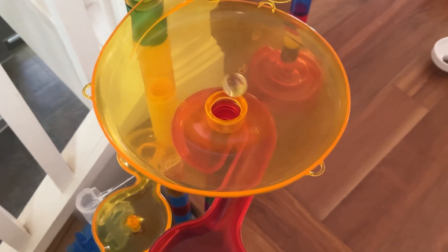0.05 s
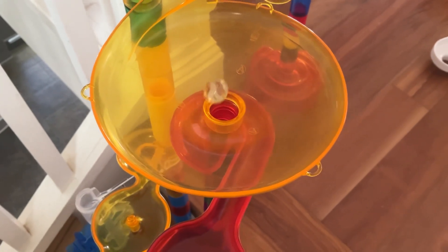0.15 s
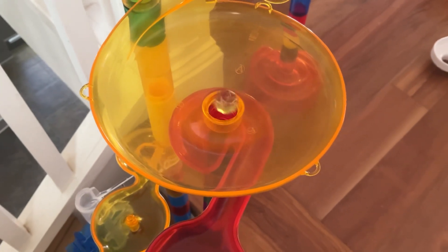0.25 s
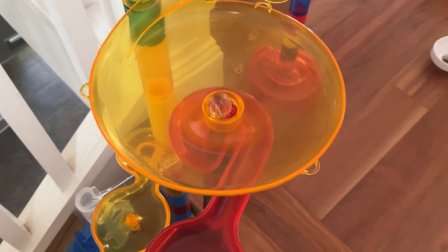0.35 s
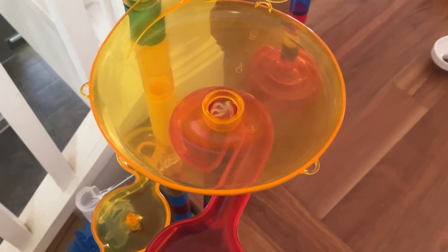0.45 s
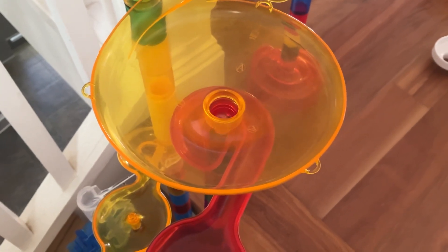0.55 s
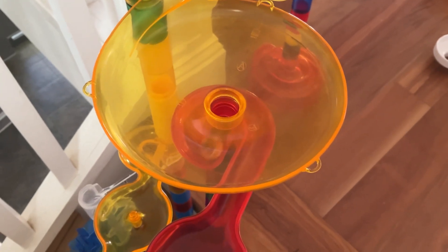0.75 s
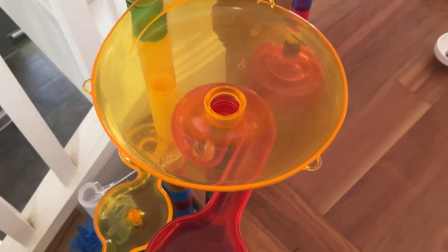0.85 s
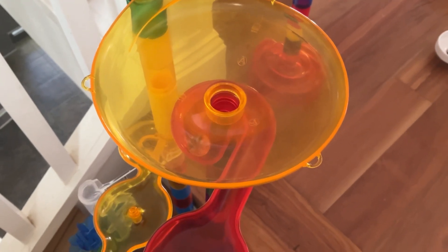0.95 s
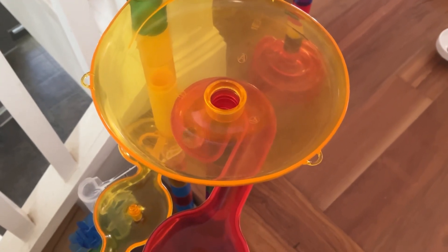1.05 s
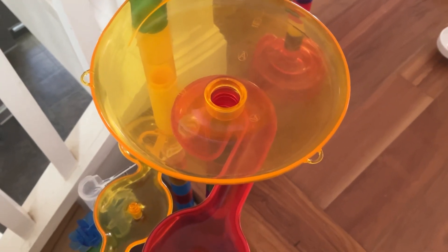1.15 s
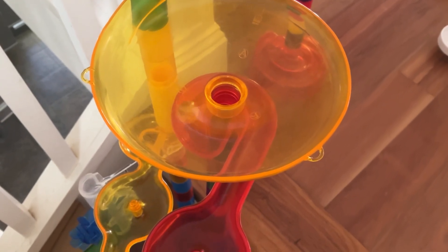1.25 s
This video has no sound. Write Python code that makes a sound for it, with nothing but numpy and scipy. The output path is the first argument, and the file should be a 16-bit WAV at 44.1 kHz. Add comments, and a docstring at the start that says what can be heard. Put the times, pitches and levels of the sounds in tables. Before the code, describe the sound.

Close up in a quiet living room, a marble rattles quickly in the throat of a plastic toy funnel, drops into the bowl beneath with two sharp knocks, skips, lands with another clack and rolls away softly.

```python
"""A glass marble circles the throat of a hard plastic funnel, chatters ever harder against the neck
and falls through. It knocks twice in the plastic bowl beneath, shaking the toy tower that holds both,
skips, and lands with one more sharp knock. Rolling drums on the thin shells; each blow cracks and
rings them briefly. Heard close, on one microphone, in a quiet living room with a faint whine."""
import sys
import numpy as np
from scipy import signal
from scipy.fft import rfft, irfft, next_fast_len
from scipy.io import wavfile
from scipy.ndimage import map_coordinates

SR = 44100
rng = np.random.default_rng(int(sys.argv[2]) if len(sys.argv) > 2 else 0)


def generate_wav(sig):
    """Save sig (samples, or channels by samples) to the path in sys.argv[1] as 16-bit PCM at SR."""
    pcm = np.round(np.clip(np.atleast_2d(sig).T, -1, 1) * 32767).astype(np.int16)
    wavfile.write(sys.argv[1], SR, pcm)


N = 57330

# spectrum of the living room's air (f/Hz, relative level/dB)
AIR_COLOUR = [(25, -27), (50, -12), (90, 7), (140, 3), (300, -0.5), (600, 4.5), (1000, -37), (2000, -5),
              (3500, -7), (5300, -14.5), (7000, -10.5), (10500, -16.5), (12500, -34), (16000, -27)]
# faint steady tones in the room (f/Hz, level/dB)
WHINE_TONES = [(97, -68.5), (2170, -60), (3300, -70), (14982, -83)]
# the marble rolling in the funnel, then in the bowl and away (t/s, level/dB)
FUNNEL_ROLL_LEVEL = [(0, -50), (.025, -40.5), (.05, -52), (.12, -55), (.175, -49), (.2, -42), (.225, -33),
                     (.27, -33.5), (.35, -34.5), (.47, -29), (.52, -44), (.58, -60.5)]
BOWL_ROLL_LEVEL = [(.5, -82), (.535, -34), (.62, -37), (.66, -39.5), (.76, -45.5), (.85, -44), (.91, -51.5),
                   (.975, -47.5), (1.03, -57), (1.19, -71), (1.24, -64), (1.3, -79)]
# spectrum of the rolling on each shell (f/Hz, relative level/dB)
FUNNEL_ROLL_SPECTRUM = [(60, -51), (200, -24), (320, -14.5), (400, -1), (520, -6), (690, 3), (880, -4.5),
                        (1060, 1.5), (1280, -9.5), (1520, -4), (1680, 3.5), (2050, -9), (2400, -8.5),
                        (3000, -22), (4000, -22), (6000, -31), (15000, -52)]
BOWL_ROLL_SPECTRUM = [(60, -38), (160, -18), (330, -3.5), (600, -3.5), (1050, 1.5), (1400, -0.5),
                      (1750, 4.5), (2400, -1), (4000, -4.5), (6000, -23), (15000, -41)]
# the funnel's lowest mode under the rolling marble (t/s, level/dB)
HUM_LEVEL = [(0, -54.5), (.1, -59), (.25, -62), (.3, -60), (.335, -35.5), (.46, -40.5), (.55, -43.5),
             (.62, -50), (.72, -90)]
# blows on the funnel's neck and on the bowl (t/s, relative level/dB, 4 kHz gain/dB, treble gain/dB)
NECK_BLOWS = [(.2033, -26.5, -2, -8), (.2085, -24.5, 2, -4.5), (.214, -22.5, 5, -11), (.219, -29.5, 10, -3),
              (.2272, -24, -6, 1), (.232, -23.5, -4, -6), (.239, -27.5, 11, -36), (.255, -36, 10, 5),
              (.2605, -28.5, 3, -8), (.28, -25.5, -7, -7), (.2988, -27, 4.5, -6), (.305, -16, -6, -10),
              (.314, -22, 5, 4.5), (.3207, -22, 18, -1.5), (.329, -22.5, 10, 2), (.3365, -22, 14, -23),
              (.342, -28.5, 17.5, -23), (.378, -16.5, -4, -2), (.3887, -20, 10.5, -4), (.4008, -17, 7.5, 3),
              (.409, -17.5, 7.5, 1.5), (.4195, -25.5, 6, 0), (.4245, -22.5, 13, 4), (.435, -22, 4.5, 1),
              (.4463, -11.5, 4, 3), (.457, -13.5, 4, 0.5), (.4683, -12.5, 3, 3.5), (.479, -22.5, 10, 12.5),
              (.4845, -16.5, 7, 1), (.4912, -21, 6, 7)]
BOWL_BLOWS = [(.513, -38, 18, 12), (.517, -23, -4, -22), (.5218, -11.5, 3, 4), (.5365, -19, 3.5, 4),
              (.557, -26.5, 8, 10), (.578, -9.5, 3, -1.5), (.614, -27, -8, -11), (.6215, -29.5, -6, -11),
              (.7903, -22, -7, -11), (.7935, -23, -6, 11.5), (.832, -9.5, 1.5, 1), (.8485, -23, -6, -8)]
# modes of each shell (f/Hz, relative level/dB, t60/s)
FUNNEL_MODES = [(402.8, -29.5, 0.046), (720, -30, 0.076), (787, -22.5, 0.073), (1019, -19, 0.043),
                (1442, -13.5, 0.097), (1663, -3.5, 0.06), (1814, -9, 0.048), (1893, -8.5, 0.028),
                (2317, -4.5, 0.03), (2481, -6, 0.03), (2760, -17.5, 0.038), (3774, -10.5, 0.014),
                (4103, -17, 0.021), (5570, -19, 0.016)]
BOWL_MODES = [(257.7, -31.5, 0.47), (599, -21, 0.052), (749, -13.5, 0.042), (989, -29.5, 0.18),
              (1072.5, -13.5, 0.055), (1411, -19, 0.1), (1670, -8.5, 0.039), (1768.5, 0.5, 0.026),
              (1977, -8.5, 0.029), (2632, -9.5, 0.021), (2988, -19.5, 0.085), (3873, -1, 0.012),
              (4033, -16.5, 0.04), (4430, -9, 0.0083)]
# the wash: each shell's dense, unresolved modes (f/Hz, relative level/dB)
FUNNEL_WASH_COLOUR = [(60, -69), (180, -35), (300, -27), (450, 2), (900, -45), (1200, -1.5), (1600, 4.5),
                      (2450, 3), (3200, -8), (3900, -5), (6000, -13), (8500, -12), (11500, -20.5),
                      (15500, -20.5)]
BOWL_WASH_COLOUR = [(60, -79), (200, -30), (500, -11.5), (900, -1), (1400, -7.5), (1800, -1), (2400, 2.5),
                    (3300, 0.5), (4100, 1), (5500, -8.5), (6500, -10.5), (10500, -18.5), (13000, -18),
                    (15500, -21.5)]
# decay of the wash (f/Hz, t60/s)
WASH_DECAY = [(200, 0.054), (1500, 0.097), (4000, .03), (8000, .022), (15000, 0.0069)]
# the small shells radiate little bass (f/Hz, gain/dB)
SHELL_RADIATION = [(40, -25.5), (120, -14), (195, -12), (260, -6.5), (400, -1)]
# the tower's two low modes, upper first (f/Hz)
TOWER_MODES = [106, 58]
# decay of the living room (f/Hz, t60/s)
ROOM_DECAY = [(150, 0.94), (600, 0.47), (2000, 0.4), (4500, 0.52), (9000, 0.61), (15000, 0.22)]
# spectrum of the room's reflections (f/Hz, relative level/dB)
ECHO_COLOUR = [(150, 4.5), (600, 0.5), (1150, 3), (1700, -3), (2400, -4.5), (3100, 1.5), (4000, -5),
               (5500, 1), (8000, 3.5), (15000, 0.5)]


def amp(db):
    return 10 ** (np.asarray(db) / 20)


def unit_rms(x):
    return x / np.sqrt(np.mean(x ** 2) + 1e-20)


def along(points, hz):
    """(f/Hz, value) points read at hz on a log axis."""
    f, values = np.transpose(points)
    return np.interp(np.log(hz + 1), np.log(f + 1), values)


def level(curve):
    """A gain for every sample from (t/s, level/dB) points."""
    return amp(np.interp(np.arange(N) / SR, *np.transpose(curve)))


def wobble(knots_per_s):
    """A smooth random curve."""
    return map_coordinates(rng.standard_normal(2000), [np.arange(N) * knots_per_s / SR])


def noise(spectrum, size):
    """Coloured noise of rms 1."""
    gain = amp(along(spectrum, np.fft.rfftfreq(size, 1 / SR)))
    return unit_rms(irfft(rfft(rng.standard_normal(size)) * gain, size))


def dying_noise(spectrum, decay, size):
    """Coloured noise in which every octave dies at its own speed."""
    hz, t = np.fft.rfftfreq(size, 1 / SR), np.arange(size) / SR
    centres = np.geomspace(125, 16000, 8)
    phases = np.exp(2j * np.pi * rng.random(len(hz)))
    steady = rfft(unit_rms(irfft(amp(along(spectrum, hz)) * phases, size)))
    bands = [irfft(steady * along(list(zip(centres, pick)), hz), size) for pick in np.eye(len(centres))]
    return sum(band * amp(-60 * t / along(decay, centre)) for centre, band in zip(centres, bands))


def coloured(x, gains):
    """x through a minimum-phase filter of (f/Hz, gain/dB) points."""
    size = 2 * len(x)
    cepstrum = irfft(np.log(amp(along(gains, np.fft.rfftfreq(size, 1 / SR)))))
    cepstrum[1:size // 2] *= 2
    cepstrum[size // 2 + 1:] = 0
    return irfft(rfft(x, size) * np.exp(rfft(cepstrum)))[:len(x)]


def room_tone(air_db=-56.5, whine_width_hz=14):
    """The air around the microphone, with a faint whine of narrow noise bands."""
    f = np.fft.rfftfreq(N, 1 / SR)
    whine = np.zeros(N)
    for hz, db in WHINE_TONES:
        peak = rfft(rng.standard_normal(N)) / (1 + (2 * (f - hz) / whine_width_hz) ** 2)
        whine += amp(db) * unit_rms(irfft(peak, N))
    return amp(air_db) * noise(AIR_COLOUR, N) + whine


def rolling(curve, spectrum, rough_db, bumps_per_s=130):
    """The rolling marble drums unevenly on the plastic."""
    return level(curve) * unit_rms(noise(spectrum, N) * amp(rough_db * wobble(bumps_per_s)))


def funnel_hum(width_hz=15.84):
    """The funnel's lowest mode sings under the rolling marble, its pitch wandering a little."""
    hz = FUNNEL_MODES[0][0] + width_hz / 2 * wobble(2 * width_hz)
    return level(HUM_LEVEL) * np.sqrt(2) * np.sin(2 * np.pi * np.cumsum(hz) / SR)


def shell_ring(modes, t, scatter_db=1):
    """A shell's modes, each excited a little differently at every spot."""
    return sum(amp(db + scatter_db * rng.standard_normal() - 60 * t / t60) * np.sin(2 * np.pi * hz * t)
               for hz, db, t60 in modes)


def glint_modes(db, count=7, low_hz=4568, high_hz=15160, fall_db_per_octave=8, t60_s=.014):
    """Thin high modes, different at every spot that is struck (f/Hz, relative level/dB, t60/s)."""
    pitches = low_hz * (high_hz / low_hz) ** ((np.arange(count) + rng.random(count)) / count)
    return [(hz, db - fall_db_per_octave * np.log2(hz / low_hz), t60_s) for hz in pitches]


def marble_blows(blows, modes, wash_colour, ring_db, wash_db, crack_db, glint_db):
    """Each contact cracks and rings the shell; the spot and the hardness of the blow colour it."""
    ring_rise_s, wash_rise_s, hard_blow_db = .0001, .00072, -15.5
    size = SR // 5
    shell, t = np.zeros(N + SR), np.arange(size) / SR
    crack = coloured(signal.unit_impulse(size), wash_colour)
    crack = amp(crack_db) * crack / np.abs(crack).max()
    for start_s, db, edge_db, treble_db in blows:
        ring = amp(ring_db) * shell_ring(modes, t) + shell_ring(glint_modes(glint_db), t)
        ring *= 1 - np.exp(-t / ring_rise_s)
        wash = amp(wash_db) * dying_noise(wash_colour, WASH_DECAY, size)
        wash *= 1 - np.exp(-t / wash_rise_s)  # builds up as bending waves cross the shell
        top_db = treble_db + 0.5 * (db - hard_blow_db)  # softer blows lose their top octave
        contact = [(2600, 0), (3800, edge_db), (4400, edge_db), (5800, treble_db), (15000, top_db)]
        shell[round(start_s * SR):][:size] += amp(db) * coloured(crack + ring + wash, contact)
    return coloured(shell[:N], SHELL_RADIATION)


def tower_thud(start_s=.526, gain_db=-35.5, t60_s=.069, rise_s=.008, upper_share=.82):
    """The tower gives one low, damped shake as the marble drops into the bowl."""
    t = np.maximum(np.arange(N) / SR - start_s, 0)
    shares = (upper_share, 1 - upper_share)
    shake = sum(share * np.sin(2 * np.pi * hz * t) for hz, share in zip(TOWER_MODES, shares))
    return amp(gain_db - 60 * t / t60_s) * (1 - np.exp(-t / rise_s)) * shake


def room_echo(x, early_db, early_t60_s=.083, tail_db=-11.5, delay_s=.007):
    """Quick echoes off nearby surfaces and the room's tail reach the microphone after the direct sound."""
    size = SR * 3 // 4
    tail = dying_noise(ECHO_COLOUR, ROOM_DECAY, size)
    early = noise(ECHO_COLOUR, size) * amp(-60 * np.arange(size) / SR / early_t60_s)
    response = amp(tail_db) * tail / np.linalg.norm(tail) + amp(early_db) * early / np.linalg.norm(early)
    return signal.fftconvolve(x, np.pad(response, (round(delay_s * SR), 0)))[:N]


def scene():
    """Funnel and bowl at one close microphone; the bowl lies nearer to reflecting parts of the tower."""
    funnel = marble_blows(NECK_BLOWS, FUNNEL_MODES, FUNNEL_WASH_COLOUR,
                          ring_db=3, wash_db=-5, crack_db=2, glint_db=-11.5)
    funnel += rolling(FUNNEL_ROLL_LEVEL, FUNNEL_ROLL_SPECTRUM, rough_db=2.5) + funnel_hum()
    bowl = marble_blows(BOWL_BLOWS, BOWL_MODES, BOWL_WASH_COLOUR,
                        ring_db=4, wash_db=-7.5, crack_db=1.5, glint_db=-17)
    bowl += rolling(BOWL_ROLL_LEVEL, BOWL_ROLL_SPECTRUM, rough_db=2) + tower_thud()
    echoes = room_echo(funnel, early_db=-15) + room_echo(bowl, early_db=-11)
    return (funnel + bowl + echoes + room_tone())[None]


def record(dry):
    """The recorder rounds off the highest peaks, drops the deepest bass and cuts the highest treble."""
    ceiling, low_cut_hz, top_hz = .92, 45, 15900
    rounded = dry / (1 + (dry / ceiling) ** 6) ** (1 / 6)
    thinned = signal.sosfilt(signal.butter(3, low_cut_hz, "high", fs=SR, output="sos"), rounded)
    size = next_fast_len(N + SR // 4)
    passband = np.fft.rfftfreq(size, 1 / SR) < top_hz
    return irfft(rfft(thinned, size) * passband, size)[..., :N]


dry = scene()
out = record(dry)
generate_wav(out)
```